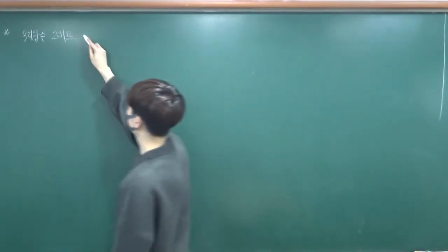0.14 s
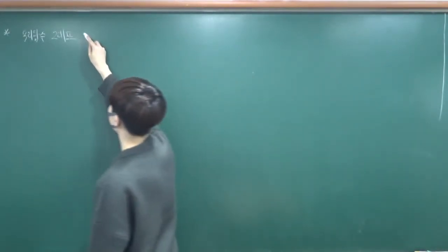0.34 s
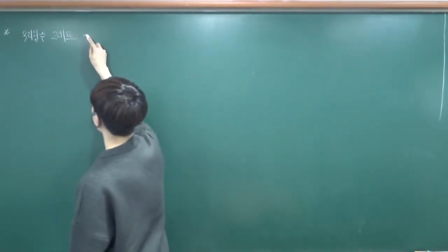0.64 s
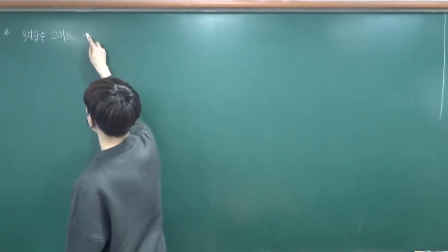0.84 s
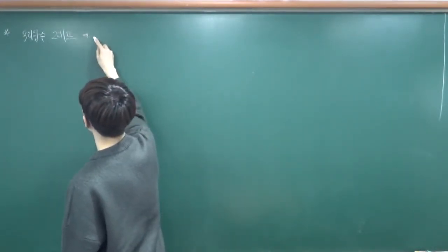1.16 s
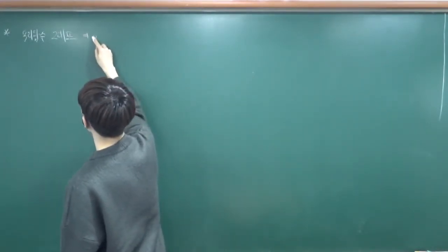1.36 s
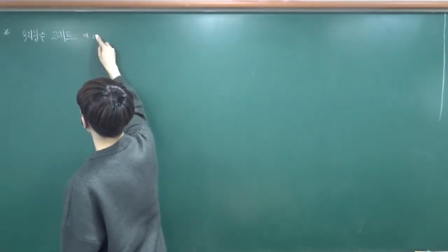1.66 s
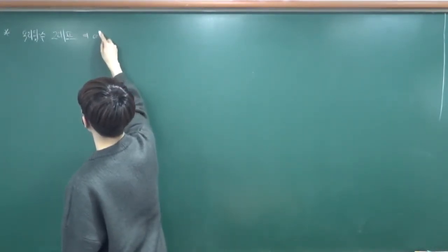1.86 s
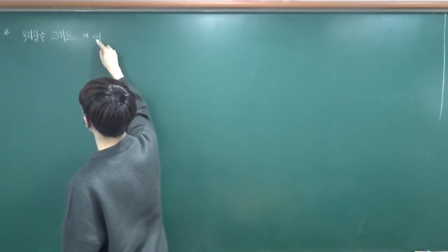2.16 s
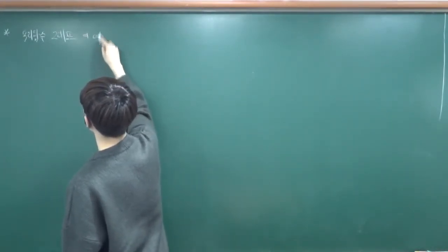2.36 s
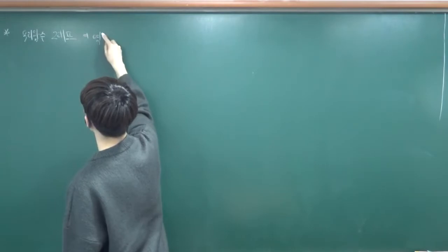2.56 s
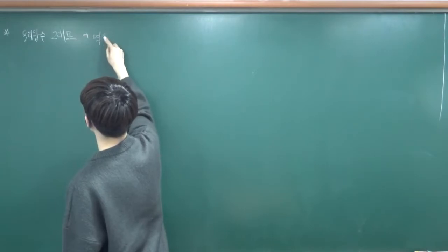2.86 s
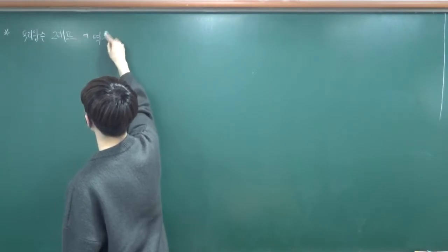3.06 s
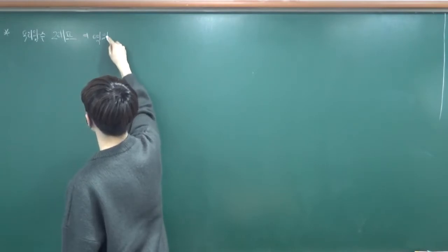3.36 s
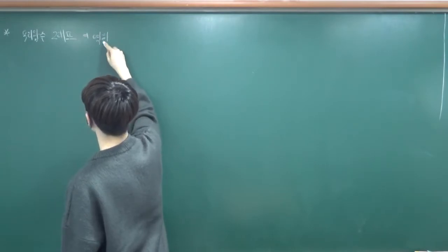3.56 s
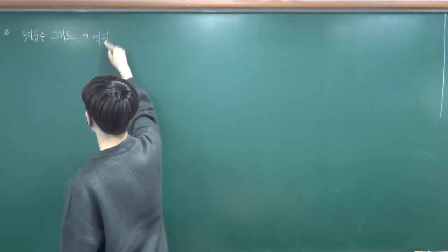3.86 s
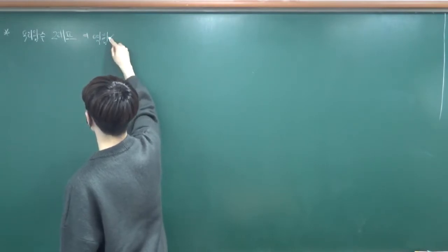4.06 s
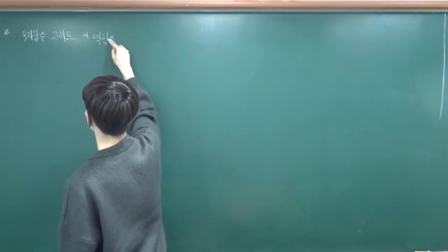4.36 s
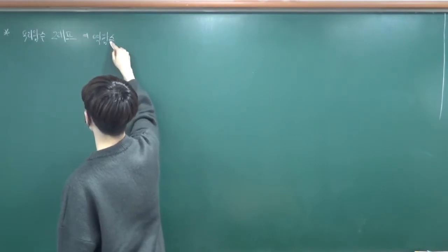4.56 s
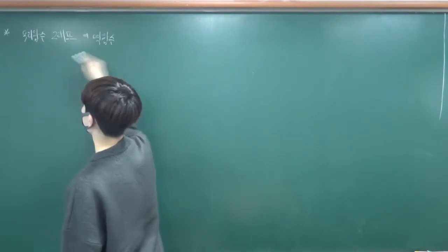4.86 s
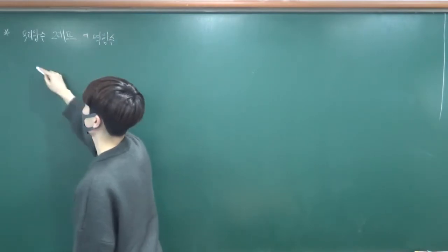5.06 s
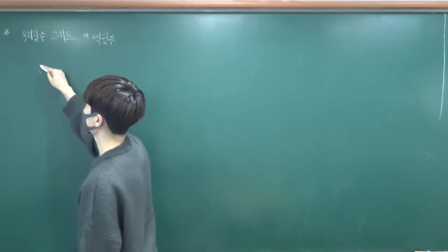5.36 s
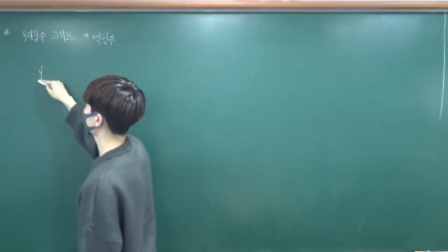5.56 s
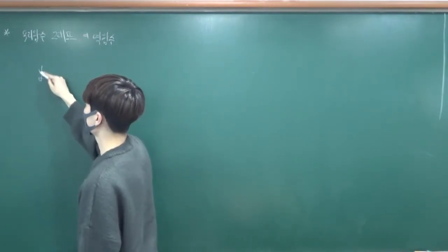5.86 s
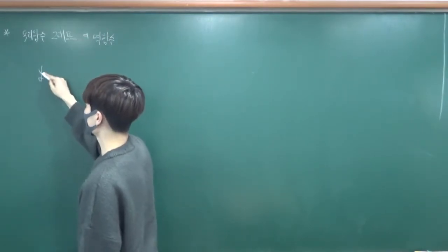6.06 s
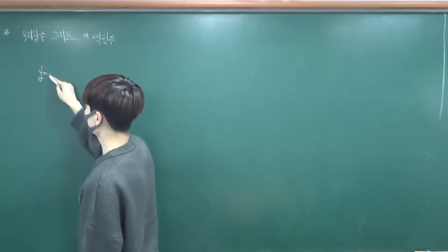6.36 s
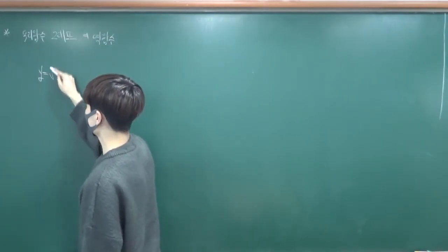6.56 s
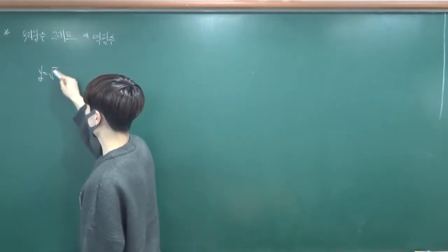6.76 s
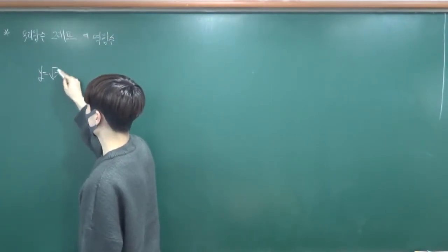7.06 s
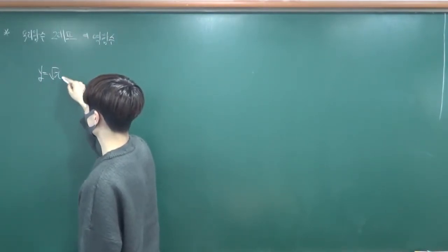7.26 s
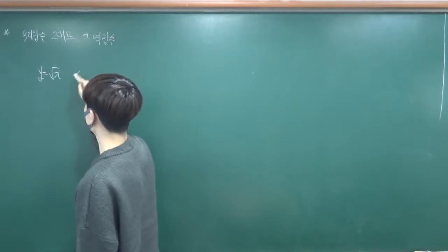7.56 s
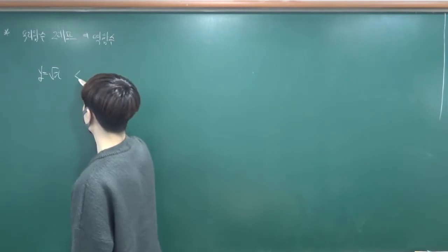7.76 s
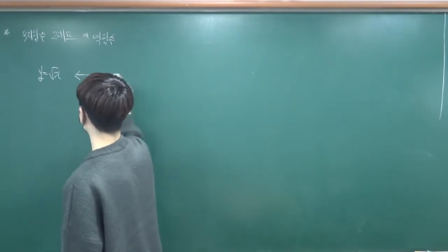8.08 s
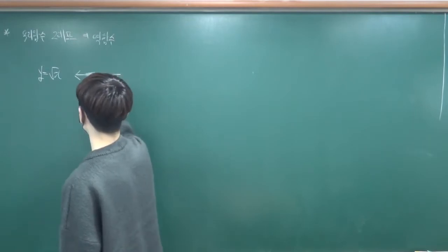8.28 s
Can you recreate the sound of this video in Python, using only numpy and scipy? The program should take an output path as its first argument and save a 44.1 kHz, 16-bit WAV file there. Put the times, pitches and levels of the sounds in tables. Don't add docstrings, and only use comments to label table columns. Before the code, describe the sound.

A stick of chalk writes briskly on a wall board, sharp ticks and woody knocks with short gritty strokes, in a reverberant room.

```python
import sys
import numpy as np
from scipy import signal
from scipy.fft import rfft, irfft
from scipy.io import wavfile
from scipy.ndimage import uniform_filter1d

SR = 44100
rng = np.random.default_rng(int(sys.argv[2]) if len(sys.argv) > 2 else 0)


def voltage_ratio(decibels):
    exponent = np.asarray(decibels, float) / 20
    return 10 ** exponent


def persist_wave(psi):
    counts = np.round(np.clip(psi, -1, 1) * 32767).astype(np.int16)
    wavfile.write(sys.argv[1], SR, np.atleast_2d(counts).T)


N = 371322


def evened(x):
    return x / np.sqrt(np.mean(x ** 2) + 1e-20)


def read(points, hz):
    f, value = np.transpose(points)
    return np.interp(np.log(hz + 1), np.log(f + 1), value)


def peaks_db(hz, peaks):
    return sum(db / (1 + (2 * (hz - f) / width) ** 2) for f, width, db in peaks)


def causal(db_at, size=4096):
    hz = abs(np.fft.fftfreq(size, 1 / SR))
    log_gain = np.log(voltage_ratio(np.maximum(db_at(hz), -100)))
    return np.fft.ifft(np.exp(np.conj(signal.hilbert(log_gain)))).real[:size // 2]


def shaped(points):
    spectrum = rfft(rng.standard_normal(N))
    gain = voltage_ratio(read(points, np.fft.rfftfreq(N, 1 / SR)))
    return evened(irfft(spectrum * gain, N))


def add(mix, s, sound):
    part = mix[round(s * SR):][:len(sound)]
    part += sound[:len(part)]


# delay t/ms, level/dB
FIRST_ECHOES = [(.58, -4), (1.8, -6), (6.7, -8.5), (7.4, -6), (8.3, -8), (16.5, -11), (21.3, -11)]
# f/Hz, time to fall 60 dB t/s
ROOM_DECAY = [(150, 1), (400, 0.51), (1000, 0.48), (2800, 0.43), (7000, 0.37), (11000, 0.27),
              (15000, 0.042)]


def room(x, wet_db, direct=0.83, build_ms=0.5):
    early = np.zeros(SR // 20)
    early[0] = direct
    for ms, db in FIRST_ECHOES:
        early[round(ms * SR / 1000)] = direct * voltage_ratio(db)
    out = signal.oaconvolve(x, early)[:N]
    turn = np.arange(N) / SR * 1.3 * np.pi
    slots = np.arange(0, SR - 12, 12)
    for k in range(3):
        echoes = np.zeros(SR)
        echoes[slots + rng.integers(0, 12, len(slots))] = rng.choice([-1., 1.], len(slots))
        hz, t, z = signal.stft(echoes, SR, nperseg=256)
        decay = voltage_ratio(-60 * t / read(ROOM_DECAY, hz)[:, None])
        tail = signal.istft(z * decay, SR, nperseg=256)[1]
        tail_ms = np.arange(len(tail)) * 1000 / SR
        tail = tail * (1 - np.exp(-(tail_ms / build_ms) ** 2))
        share = np.sqrt(2 / 3) * np.cos(turn + k * np.pi / 3)
        out = out + voltage_ratio(wet_db) * signal.fftconvolve(x * share, tail / np.linalg.norm(tail))[:N]
    return out


def shakes():
    rest_db, shake_db, rise_s, t60_s = -53.5, -19.5, 0.037, 0.45
    out, t = np.full(N, voltage_ratio(rest_db)), np.arange(SR // 2) / SR
    for s, knock_db, *_ in UPPER_ROW + LOWER_ROW:
        fall = voltage_ratio(knock_db + shake_db - 60 * t / t60_s)
        add(out, s, fall * (1 - np.exp(-t / rise_s)))
    return out


# f/Hz, level/dB
AIR = [(20, -15), (45, -12), (70, -1), (130, -0.5), (270, -8), (400, -19), (600, -10), (1000, -14),
       (2000, -20.5), (4000, -27), (6500, -19.5), (10000, -29.5), (16000, -36)]
AIR_DB = -48.5


def wash():
    drone_db, drone_swell_db = -53.5, 6.5
    drone = shaped([(30, -40), (46, -12), (55, 0), (65, -10), (90, -40)])
    movement = shaped([(40, -57), (80, -2), (130, -3.5), (220, 2.5), (400, -5.5), (900, -35)])
    swell = evened(uniform_filter1d(rng.standard_normal(N), SR // 2))
    air = voltage_ratio(AIR_DB) * shaped(AIR)
    return air + voltage_ratio(drone_db + drone_swell_db * swell) * drone + shakes() * movement


# f/Hz, peak level/dB, length t/s
BUZZ_TONES = [(2650, -50, .0022), (4050, -54, .0024), (8000, -62, .0015)]


def buzz():
    first_s, per_s = .003, 30000 / 1001
    out, t = np.zeros(N), np.arange(SR // 60) / SR
    for s in np.arange(first_s, N / SR, 1 / per_s):
        for hz, db, length in BUZZ_TONES:
            size_db = db + 2.0 * rng.standard_normal()
            burst = np.exp(-((t - .006) / length) ** 2)
            add(out, s, voltage_ratio(size_db) * burst * np.sin(2 * np.pi * hz * t))
    return out


# t/s, f/Hz, level/dB
CHIRP = (2.363, 2640, -33)


def squeak():
    out, t = np.zeros(N), np.arange(SR // 30) / SR
    s, hz, db = CHIRP
    chirp = np.exp(-((t - .008) / 0.0028) ** 2) * np.sin(2 * np.pi * hz * t)
    tick = np.exp(-((t - .006) / .0015) ** 2) * rng.standard_normal(len(t))
    add(out, s, voltage_ratio(db) * (chirp + 0.37 * tick))
    return out


# t/s, level/dB, f/Hz
SOFT_BUMPS = [(1.371, -31, 173), (1.5, -50, 108), (1.375, -30, 257), (1.47, -40, 272), (1.47, -45, 178),
              (1.81, -31, 188), (1.819, -30, 297), (1.956, -28, 250), (2.06, -29.5, 297), (5.738, -41, 390),
              (8.299, -47, 156.5), (8.41, -37, 298)]


def bumps():
    out, t = np.zeros(N), np.arange(SR // 4) / SR
    for s, db, hz in SOFT_BUMPS:
        fuzz = 1 + .9 * evened(uniform_filter1d(rng.standard_normal(len(t)), 350))
        swell = voltage_ratio(db - 60 * t / 0.17) * (1 - np.exp(-t / 0.018))
        add(out, s, swell * fuzz * np.sin(2 * np.pi * hz * t))
    return out


# t/s, rise t/s, 60 dB fall t/s, level/dB
TIP_FLICKS = [
    (0.046, 0.04, 0.16, -38),
    (8.05, 0.1, 0.33, -57.5),
]
# f/Hz, level/dB
DUST_HISS = [(1500, -53), (3500, -8.5), (6500, 3), (8500, 0), (9500, -7), (12000, -2), (15500, -18)]


def flicks():
    out, t, hiss = np.zeros(N), np.arange(SR // 3) / SR, shaped(DUST_HISS)
    for s, rise, t60, db in TIP_FLICKS:
        swell = np.minimum(t / rise, 1) * voltage_ratio(db - 60 * np.maximum(t - rise, 0) / t60)
        add(out, s, swell * hiss[round(s * SR):][:len(t)])
    return out


# start t/s, length t/s, hiss level/dB
CHALK_STROKES = [(0.0, 0.23, -44.5), (.33, 0.14, -64), (1.22, 0.21, -76), (1.737, 1, -54.5),
                 (2.443, 0.16, -44), (2.678, 0.48, -45), (3.166, 0.36, -52), (4.0, 0.14, -59),
                 (4.27, 0.18, -45), (4.694, 0.38, -50.5), (5.3, 0.75, -60.5), (6.0, 0.22, -64),
                 (6.35, 0.52, -60), (7.198, 0.94, -55), (7.894, 0.42, -53.5)]


def strokes():
    lifted_db, roundness = -69.5, 0.65
    out = np.full(N, voltage_ratio(lifted_db))
    for s, length, db in CHALK_STROKES:
        arch = abs(np.sin(np.pi * np.arange(0, length, 1 / SR) / length))
        add(out, s, voltage_ratio(db) * arch ** roundness)
    return out


# f/Hz, level/dB
SLIDE = [(200, -25), (600, -8.5), (1500, -6), (3000, -5), (4500, -9), (6500, 1), (9000, -5), (12000, -12.5),
         (16000, -11)]


def scrape():
    grains_per_s = 6000
    sizes = rng.standard_normal(N) * voltage_ratio(4.53 * rng.exponential(1, N))
    grains = sizes * (rng.random(N) < grains_per_s / SR)
    flutter_db = 3.6 * evened(uniform_filter1d(rng.standard_normal(N), 700))
    coloured = signal.oaconvolve(grains * voltage_ratio(flutter_db), causal(lambda hz: read(SLIDE, hz)))[:N]
    return voltage_ratio(-6.5) * strokes() * evened(coloured)


# f/Hz, width f/Hz, level/dB
PANEL_MODES = [(259, 38, 5.5), (457.5, 11, 10), (657, 39, 4), (730, 20, 6), (1041, 34, 2), (1295, 330, 6),
               (1940, 600, 1.5), (3035, 360, 5.5)]


def knock(db, thud_db, low_db, upper_db):
    regions = [(110, thud_db - 44.0), (230, thud_db + 1), (350, thud_db + 7.5),
               (410, low_db + 9.0), (530, low_db + 11.0), (580, db + 0.5), (850, db - 4.5),
               (950, upper_db + 2), (1400, upper_db - 6.5), (2100, upper_db - 7.0),
               (3300, upper_db - 18), (5000, upper_db - 39)]
    spot_db = 1.8 * rng.standard_normal(len(PANEL_MODES))
    modes = [(hz, width, peak_db + chance)
             for (hz, width, peak_db), chance in zip(PANEL_MODES, spot_db)]
    return causal(lambda hz: read(regions, hz) + peaks_db(hz, modes))


# t/s, knock level/dB, tick level/dB, low ring level/dB, thud level/dB
UPPER_ROW = [(0.049, -19.5, -33.5, -27.5, -26), (0.319, -20.5, -30, -28, -31),
             (0.58, -18.5, -29, -28.5, -29), (0.839, -19.5, -25.5, -28.5, -30.5),
             (1.145, -11.5, -23.5, -25.5, -30), (1.364, -27, -39.5, -47, -31),
             (1.558, -17, -25, -28.5, -36), (1.731, -15.5, -24.5, -26.5, -32.5),
             (1.948, -12.5, -25.5, -29.5, -20), (2.153, -21, -31, -26.5, -40),
             (2.482, -10, -21, -27, -29.5), (2.645, -9, -22.5, -25, -34), (2.813, -12, -25, -26, -30),
             (3.174, -11, -23, -25.5, -30.5), (3.409, -15, -27.5, -25, -40), (3.564, -13, -20.5, -21, -29),
             (4.002, -17, -24, -28, -31.5), (4.361, -14.5, -24.5, -24, -31.5), (4.57, -16, -22, -24, -29),
             (4.741, -17.5, -29, -33.5, -35)]
LOWER_ROW = [(5.172, -11, -21.5, -23, -20), (5.402, -19.5, -27, -26.5, -29.5),
             (5.926, -13, -22, -24.5, -22.5), (6.115, -15.5, -26, -25.5, -23.5),
             (6.32, -14.5, -24, -26.5, -25), (6.841, -15.5, -26.5, -26.5, -26.5),
             (7.131, -16, -30, -26.5, -25.5), (7.319, -18, -33.5, -28, -28),
             (7.514, -14, -23, -25.5, -25.5), (7.929, -12, -28, -23, -20.5)]
LIGHT_TOUCHES = [
    (1.935, -23, -37, -59, -48),
    (3.724, -50, -38, -53, -57),
    (4.235, -58, -26.5, -52, -48),
]


def landings():
    ring_db, ring_per_tick, usual_tick_db, touch_db = -19, 0.64, -24, -27
    full = []
    for rows, light_db in [(UPPER_ROW + LOWER_ROW, 0), (LIGHT_TOUCHES, touch_db)]:
        for s, db, tick_db, low_db, thud_db in rows:
            upper_db = ring_db + light_db + ring_per_tick * (tick_db - usual_tick_db)
            full.append((s, db, tick_db, thud_db, low_db, upper_db))
    return full


# f/Hz, level/dB
TIP_TICK = [(900, -69), (2200, -5), (3300, -2), (4500, 1), (6500, 5), (8500, 0), (12000, -6.5), (14000, -3),
            (16000, -23)]


def chalk_taps():
    ticks, crumbs, panel = np.zeros(N), np.zeros(N), np.zeros(N)
    t = np.arange(SR // 3) / SR
    hiss = shaped(DUST_HISS)
    for s, db, tick_db, thud_db, low_db, upper_db in landings():
        dull_db = .5 * (tick_db + 12)
        tick = causal(lambda hz: read(TIP_TICK, hz) + dull_db * np.log2(np.maximum(hz / 7000, 1)))
        dust = hiss[round(s * SR):][:len(t)]
        add(ticks, s, voltage_ratio(tick_db + 20.5) * tick)
        add(crumbs, s, voltage_ratio(tick_db - 1 - 60 * t / .016) * dust)
        add(ticks, s, voltage_ratio(tick_db - 25.0 - 60 * t / 0.48) * dust)
        blow = voltage_ratio(29.0) * knock(db, thud_db, low_db, upper_db)
        add(panel, s, blow)
        add(panel, s - .005, voltage_ratio(-25.5) * blow)
        boom = voltage_ratio(db - 37 - 60 * t / 0.23) * (1 - np.exp(-t / 0.015))
        add(panel, s, boom * np.sin(2 * np.pi * 128 * t))
    return ticks, crumbs, panel


# f/Hz, level/dB
UNSHARED = [(60, -67), (300, -29), (1000, -37), (3000, -62), (5000, -1.5), (8000, -22), (15000, -18)]


def scene():
    ticks, crumbs, panel = chalk_taps()
    thumps = bumps()
    ticks = ticks + scrape() + flicks()
    panel = panel + voltage_ratio(-6) * thumps
    heard = room(ticks, 7.0, direct=1., build_ms=5.5) + crumbs + room(panel, 9.0, direct=1., build_ms=2.5)
    shared = heard + voltage_ratio(3.5) * thumps + squeak() + wash() + buzz()
    apart = room(ticks + panel, 7.4, direct=0) + voltage_ratio(AIR_DB + 2) * shaped(AIR)
    apart = signal.oaconvolve(apart, causal(lambda hz: read(UNSHARED, hz)))[:N]
    return np.array([shared + apart, shared - apart])


def band_limit(x):
    return signal.sosfilt(signal.butter(12, 16820, fs=SR, output="sos"), x)


# f/Hz, width f/Hz, level/dB
HOUSING_DIPS = [(3505, 114, -4.5), (5140, 730, -9.5)]
# f/Hz, left minus right level/dB
PORT_BALANCE = [(60, 3), (99, 0), (160, 4), (270, 3), (450, 2.0), (740, 1), (1220, 0.0), (2010, 0),
                (3330, -4), (5500, 1), (9080, -1.5), (15000, -1)]


def record(dry):
    edge_hz = 15780

    def colour(hz, side):
        top_edge = -32 * np.clip((hz - edge_hz) / 60, 0, 1)
        return peaks_db(hz, HOUSING_DIPS) + top_edge + side * read(PORT_BALANCE, hz) / 2

    ports = np.array([causal(lambda hz: colour(hz, side)) for side in (1, -1)])
    mix = signal.oaconvolve(dry, ports, axes=1)[:, :N]
    return band_limit(mix)


dry = scene()
out = record(dry)
persist_wave(out)
```